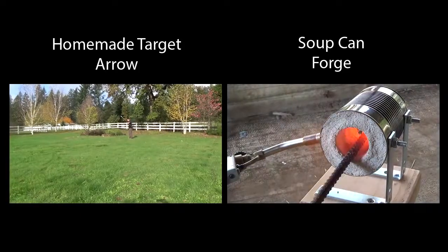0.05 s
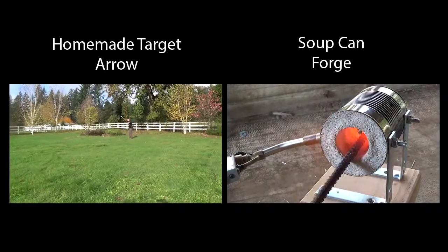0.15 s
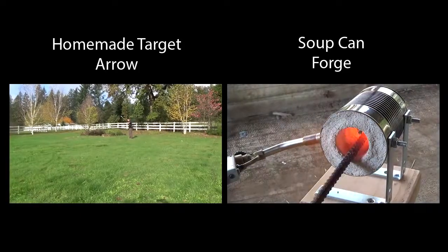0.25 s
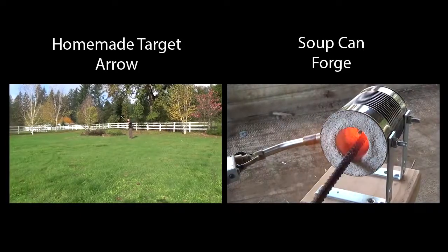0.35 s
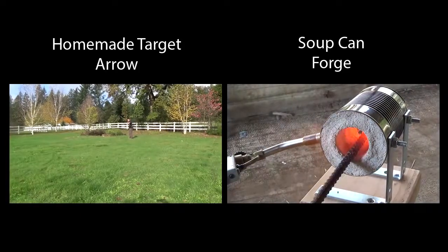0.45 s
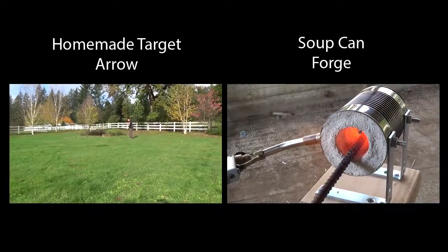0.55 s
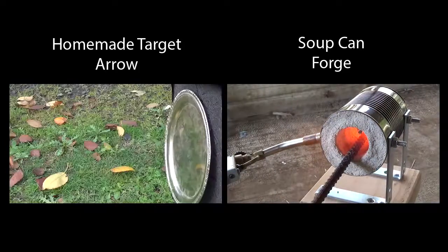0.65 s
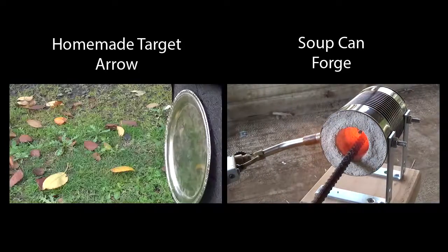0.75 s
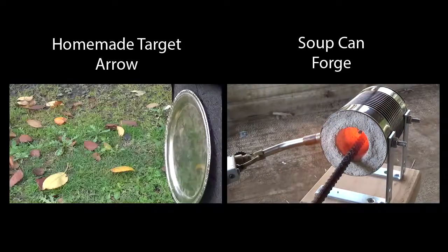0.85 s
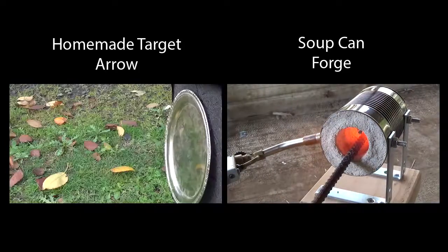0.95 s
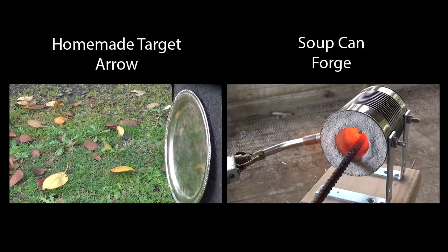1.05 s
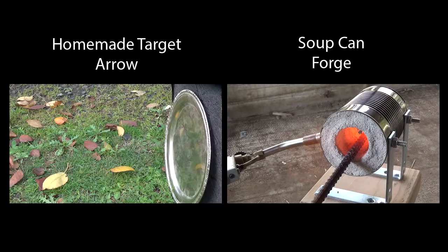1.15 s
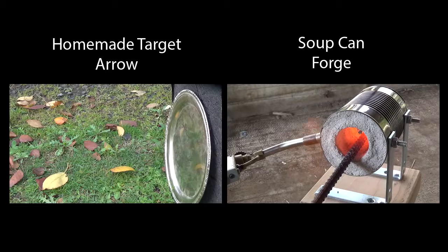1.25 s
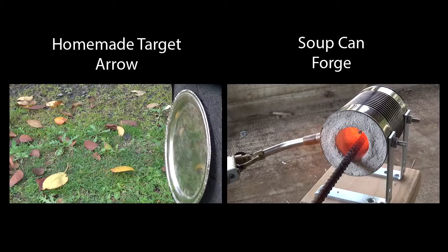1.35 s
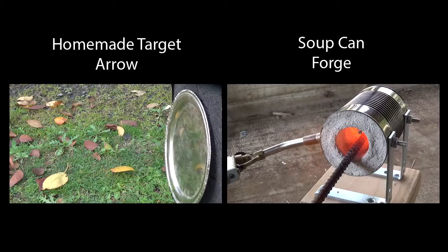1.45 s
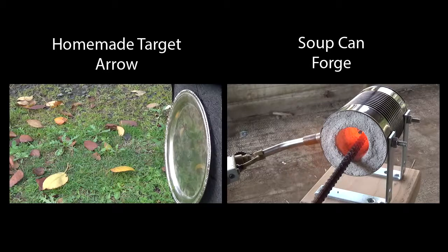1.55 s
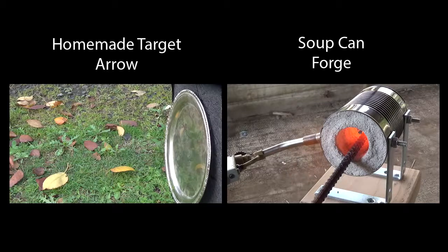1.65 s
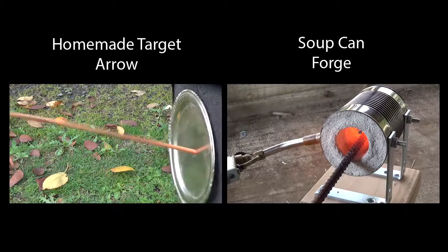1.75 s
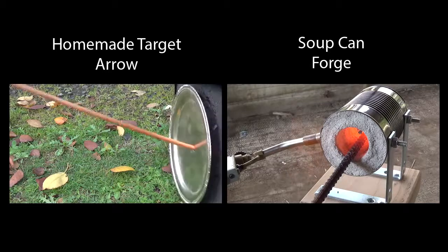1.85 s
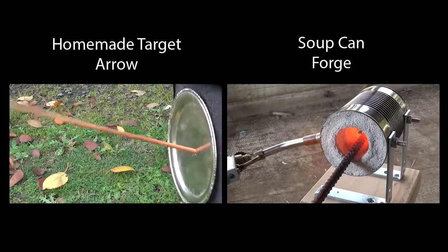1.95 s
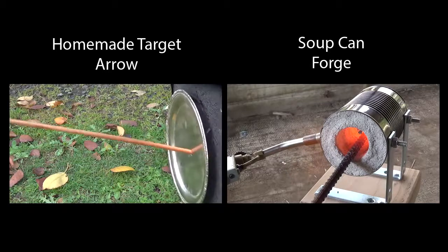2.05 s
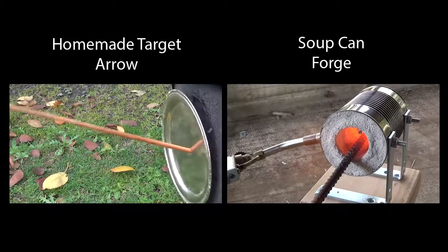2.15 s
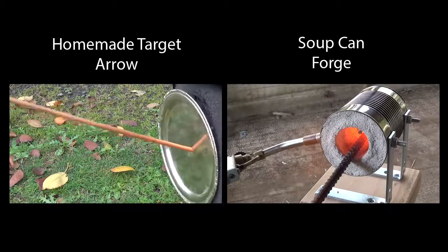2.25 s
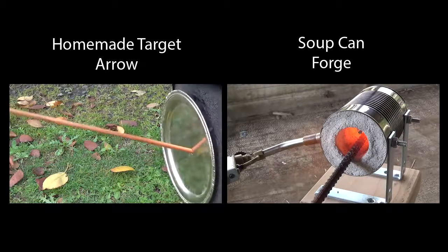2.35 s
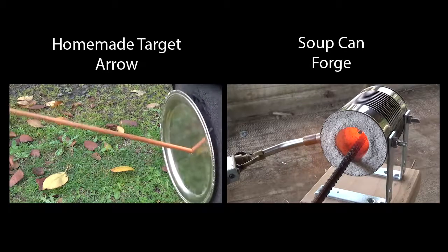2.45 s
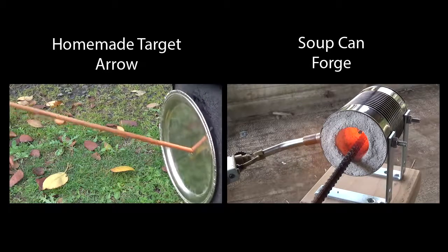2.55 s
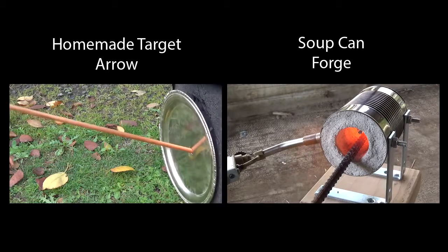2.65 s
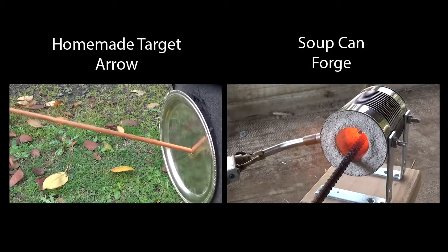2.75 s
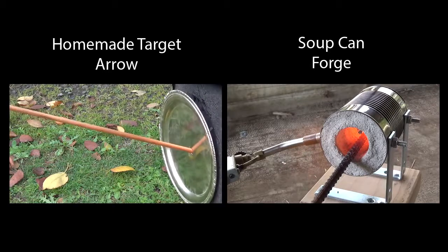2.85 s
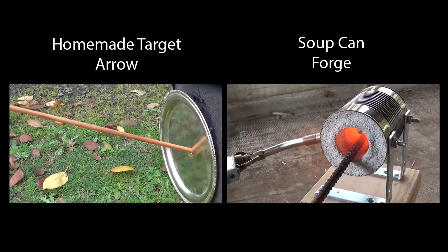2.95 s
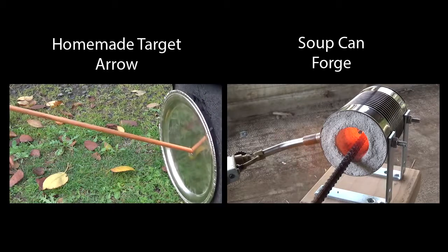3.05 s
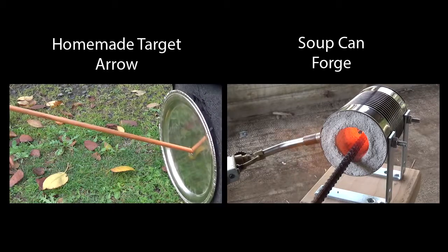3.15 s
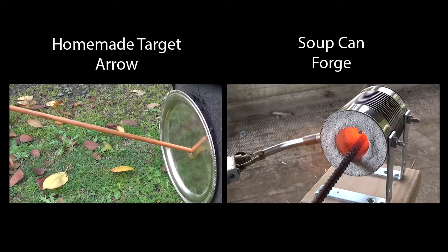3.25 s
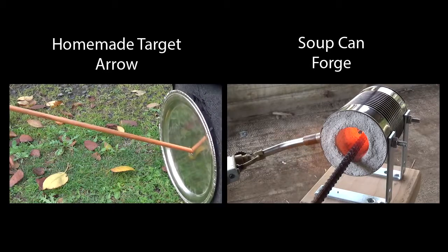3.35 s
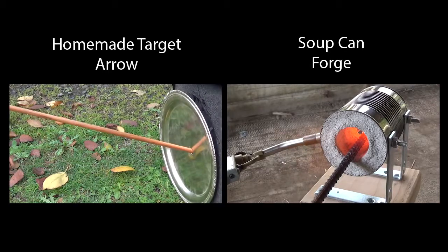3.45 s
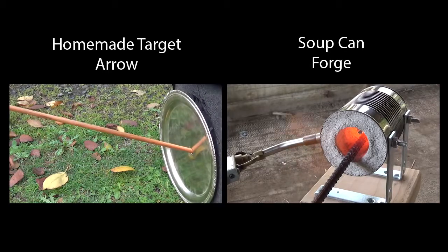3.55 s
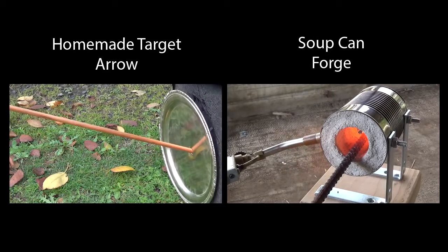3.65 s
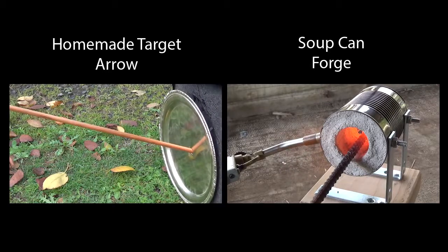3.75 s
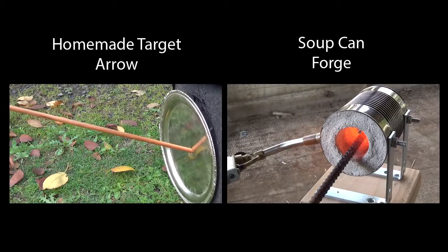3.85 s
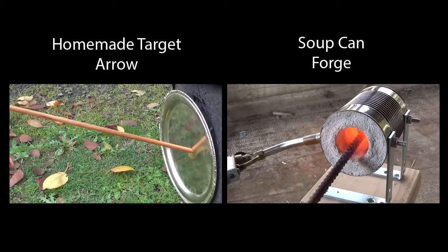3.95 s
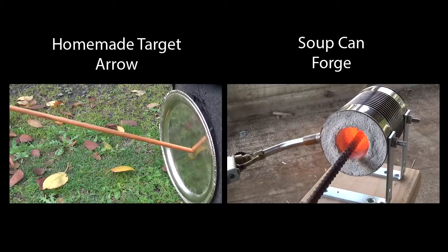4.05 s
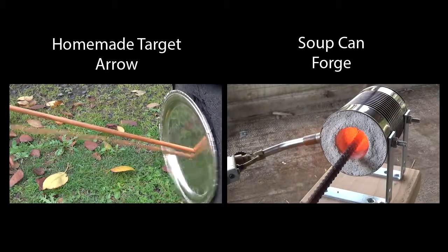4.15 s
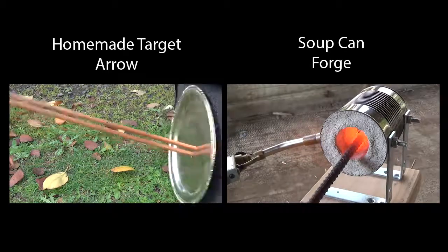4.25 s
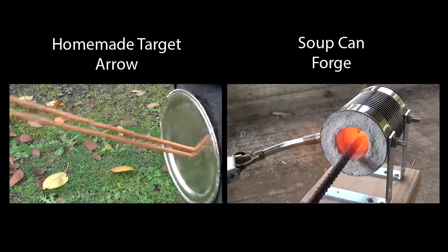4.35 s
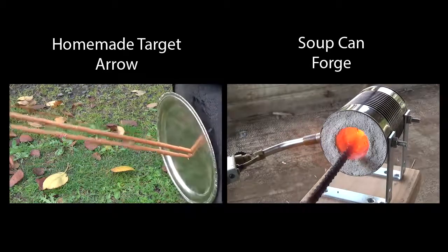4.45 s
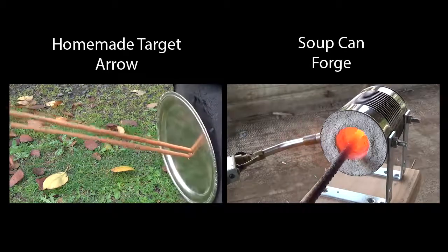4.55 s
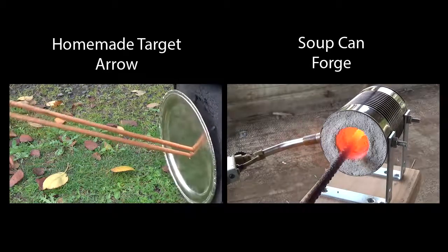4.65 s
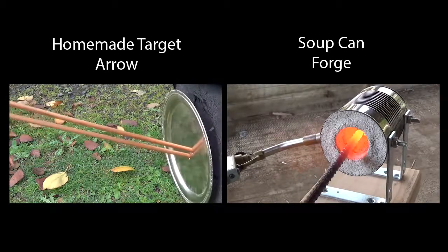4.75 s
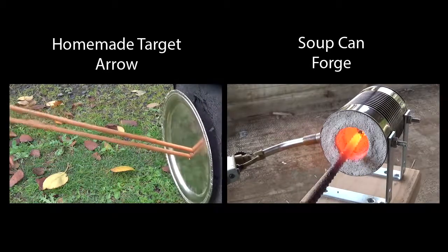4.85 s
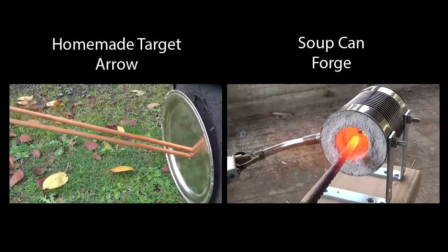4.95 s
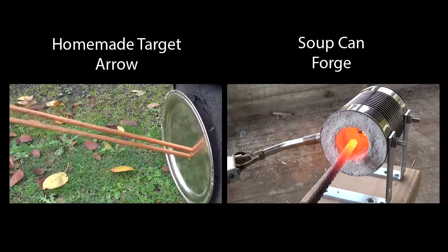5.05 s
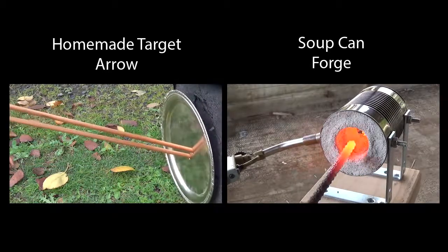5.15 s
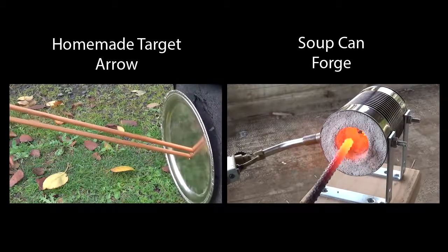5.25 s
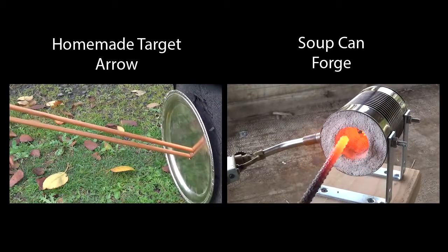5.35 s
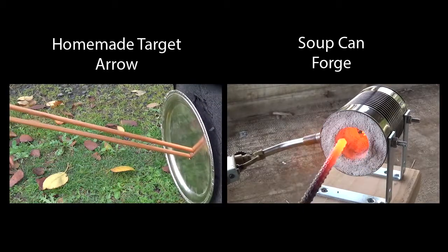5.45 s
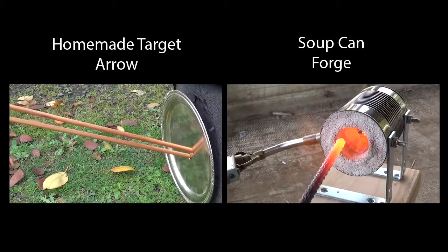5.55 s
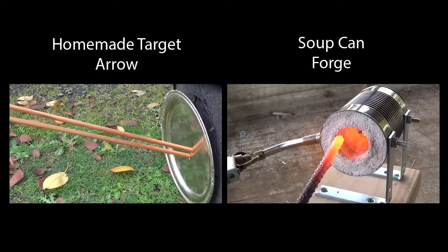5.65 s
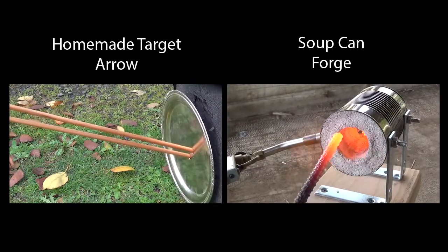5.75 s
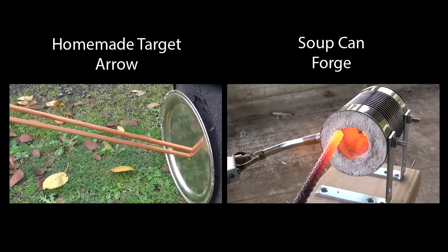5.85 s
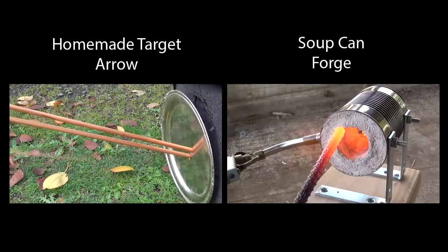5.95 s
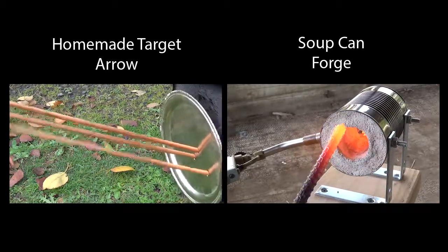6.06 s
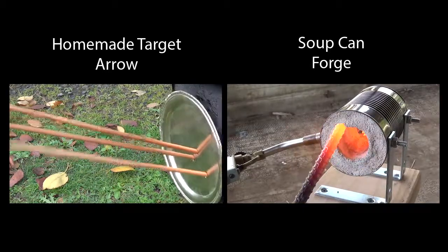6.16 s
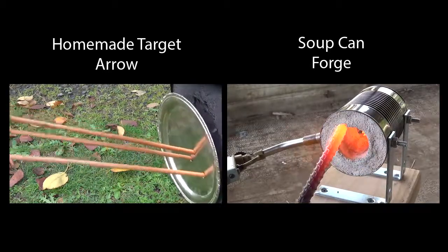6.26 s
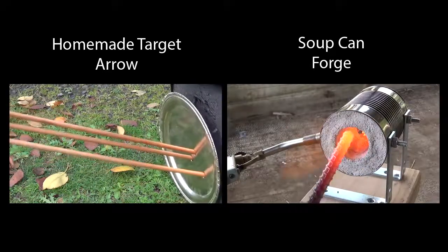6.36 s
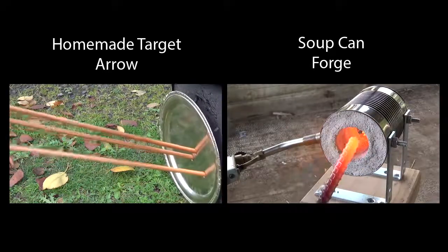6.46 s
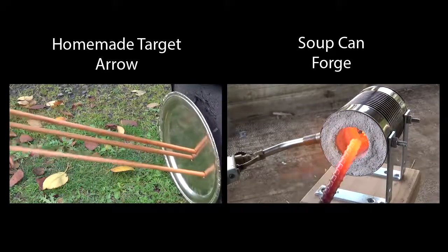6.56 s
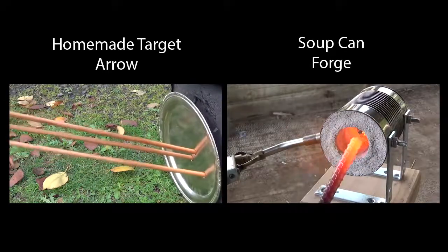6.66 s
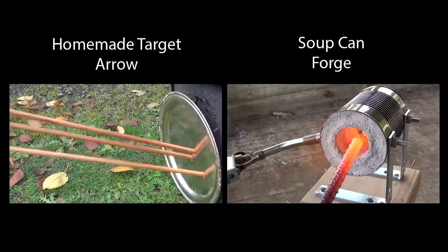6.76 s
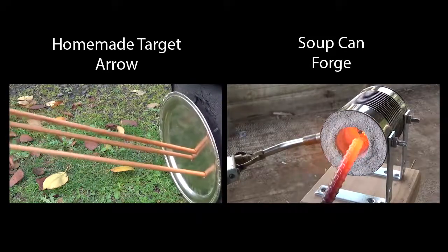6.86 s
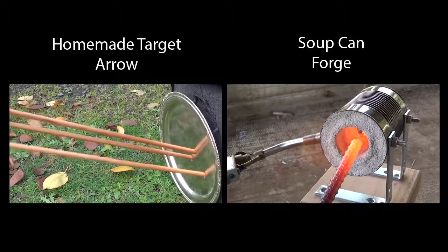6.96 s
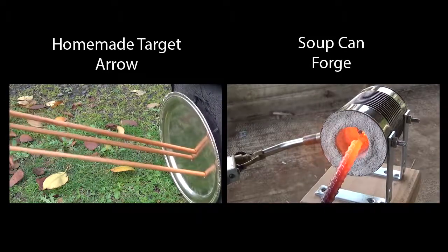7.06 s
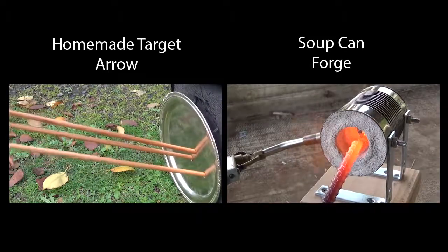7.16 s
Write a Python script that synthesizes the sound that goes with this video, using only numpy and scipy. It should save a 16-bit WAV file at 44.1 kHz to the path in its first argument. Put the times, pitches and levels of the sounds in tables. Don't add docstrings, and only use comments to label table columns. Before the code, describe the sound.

From 0 s a gas torch burns close to the stereo microphone, a steady airy hiss and soft turbulent roar coloured by a small hollow can, with little spits and swells around 0.8, 1.2 and 2.5 s. A faint distant engine drones mostly right from 0.6 to 3.2 s, rising in pitch, then again lower from 3.9 to 5.4 s. At 1.8 s a bright string slap and low bow thump lead straight into an arrow hitting a thin metal tray: a sharp crack and noisy tinny rattle, gone in about half a second. A second, drier shot lands at 4.2 s, with small ticks near 4.6 s. From 3.4 to 6.75 s the flame's hollow resonance shifts as a rod is withdrawn. The third strike at 6.05 s has a fainter slap, brief chatter and ticks until 6.45 s. A sharp flame spit comes at 6.6 s, then the roar weakens slightly, continuing to 7.2 s.

```python
import sys
import numpy as np
from scipy import signal
from scipy.io import wavfile

SR = 44100
rng = np.random.default_rng(int(sys.argv[2]) if len(sys.argv) > 2 else 0)


def digitize_waveform(pressure):
    field = np.atleast_2d(pressure).T
    bounded = np.clip(field, -1, 1)
    quanta = np.round(bounded * 32767).astype(np.int16)
    wavfile.write(sys.argv[1], SR, quanta)


def voltage_ratio(decibels):
    exponent = np.asarray(decibels, float) / 20
    return 10 ** exponent


N = 317069


def at_hz(points, hz):
    table_hz, level_db = np.transpose(points)
    return np.interp(np.log(hz), np.log(table_hz), level_db)


def in_time(rows, times):
    row_s, *columns = np.transpose(rows)
    return [np.interp(times, row_s, column) for column in columns]


def rms_one(x):
    return x / np.sqrt(np.mean(x ** 2) + 1e-20)


def drift(rate_hz):
    r = np.exp(-80 * np.pi * rate_hz / SR)
    noise = rng.standard_normal(N // 40 + 2002)
    slow = signal.lfilter([1], [1, -2 * r, r * r], noise)[2000:]
    return np.interp(np.arange(N) / 40, np.arange(len(slow)), rms_one(slow))


def resonate(x, hz, width_hz):
    r = np.exp(-np.pi * width_hz / SR)
    feedback = [1, -2 * r * np.cos(2 * np.pi * hz / SR), r * r]
    return signal.lfilter((1 - r * r) / 2 * np.array([1, 0, -1]), feedback, x)


def add(out, sound, start_s):
    i = int(start_s * SR)
    out[..., i:i + sound.shape[-1]] += sound[..., :N - i]


# pitch_hz, level_db
FLAME_SIDE = [(60, -2.5), (140, -12), (350, -14.5), (830, -12.5), (2000, -24.5), (4810, -7.5), (11600, -9)]
# pitch_hz, left_minus_right_db
LEAN = [(60, -13.5), (140, -7), (350, -3.5), (830, 0), (2000, -1), (4810, -0.5), (11600, 1.5)]


def spread(mid_side, hz):
    side = voltage_ratio(at_hz(FLAME_SIDE, hz) - 2.5) * mid_side[1]
    pair = mid_side[0] + side * [[1], [-1]]
    return pair * voltage_ratio(at_hz(LEAN, hz) * np.array([[.5], [-.5]]))


# pitch_hz, level_db_per_hz
ROAR = [(18, -50), (30, -24), (129, -3.5), (432, -5), (1000, -3), (1220, -4.5), (1560, 1.5), (2560, -12.5),
        (3040, -13), (3440, -23), (3900, -11), (4200, -26.5), (11000, -21.5), (14300, -58), (22000, -120)]
# pitch_hz, width_hz, rod_in_db, rod_out_db
CAVITY = [(518, 87, -10, -3.5), (713, 110, -3, -26), (866, 66, -15, -2.5), (983, 84, -0.5, -4.5),
          (1500, 130, 4, -24), (1745, 120, -13, -1), (2196, 110, -4, -11.5), (2765, 97, -13, -20),
          (3010, 79, -1.5, -3.5), (3893, 78, -13.5, -16.5), (4720, 210, -21, -19.5), (5114, 122, -21, -13),
          (5316, 28, -14.5, -25), (6000, 440, -24, -20), (6170, 17, -14, -9.5), (7040, 220, -27, -15.5),
          (7580, 300, -30, -29), (8100, 77, -28, -52), (9960, 210, -21, -54)]
# pitch_hz, width_hz, depth (0 to 1)
HOLLOWS = [(444, 32, 0.45), (1225, 45, 0.44), (3440, 210, 0.32), (6650, 440, 0), (9260, 520, 0.34)]
# time_s, level_db
FLAME = [
    (0, -48.5),
    (1.2, -48.5),
    (3.6, -49),
    (4.5, -48),
    (6.5, -48.5),
    (6.9, -51.5),
    (7.19, -51),
]
# centre_s, more_hiss_db, half_length_s
GUSTS = [
    (0.83, 4, 0.11),
    (1.25, 2.5, 0.82),
    (2.46, 3.5, .06),
    (2.992, 1.7, 0.3),
    (4.304, 2.7, 0.48),
    (6.615, 5, .06),
]
HISS_DB, HISS_FOLLOWS = -63, 0.6
ROD_STARTS_S, ROD_OUT_S, ROD_REST = 3.4, 6.75, 0.076


def furnace(roar_db=-3.5, flicker_db=0.76, patchy_db=1.5):
    times = np.arange(N) / SR
    flame_db, = in_time(FLAME, times)
    hiss_db = HISS_DB + HISS_FOLLOWS * (flame_db - flame_db.mean())
    for centre_s, more_db, half_s in GUSTS:
        hiss_db = hiss_db + more_db * np.exp(-((times - centre_s) / half_s) ** 2)
    rod_out = np.interp(times, [ROD_STARTS_S, ROD_OUT_S], [ROD_REST, 1])
    white = rng.standard_normal((2, 2, N))
    surge_db = flicker_db * drift(14.4)

    low, high = np.zeros((2, N)), np.zeros((2, N))
    edges = 28 * 2 ** np.arange(0, 9, .4)
    for k, (bottom_hz, top_hz) in enumerate(zip(edges, edges[1:])):
        hz = np.sqrt(bottom_hz * top_hz)
        band_filter = signal.butter(2, [bottom_hz, top_hz], "band", fs=SR, output="sos")
        band = signal.sosfilt(band_filter, white[k % 2])
        level_db = at_hz(ROAR, hz) + roar_db + patchy_db * drift(7.7)
        add(high if hz > 3400 else low, voltage_ratio(level_db) * spread(band, hz), 0)

    white = rng.standard_normal((2, N))
    for k, (hz, width_hz, in_db, out_db) in enumerate(CAVITY):
        once = resonate(white, hz, 1.75 * width_hz)
        band = resonate(once, hz, 1.75 * width_hz) * (-1) ** k
        level_db = in_db + rod_out * (out_db - in_db) + patchy_db * drift(2.2)
        add(high if hz > 3400 else low, voltage_ratio(level_db) * spread(band, hz), 0)

    flame = rms_one(low) * voltage_ratio(flame_db + surge_db) + rms_one(high) * voltage_ratio(hiss_db + surge_db)
    for hz, width_hz, depth in HOLLOWS:
        flame = flame - depth * resonate(flame, hz, width_hz)
    return flame


# time_s, pitch_hz, level_db
ENGINE = [
    [(.62, 78, -77), (.75, 77.7, -67.5), (1.3, 76.8, -67), (1.75, 85.3, -67), (2.4, 93.1, -76),
     (3, 92.8, -73.5), (3.25, 91.5, -87)],
    [(3.9, 66, -85), (4.1, 63.8, -77), (4.6, 62.7, -70), (5.2, 55.7, -73), (5.45, 57, -122)],
]


def engine():
    out, times = np.zeros(N), np.arange(N) / SR
    for rows in ENGINE:
        hz, level_db = in_time(rows, times)
        on = (times > rows[0][0]) & (times < rows[-1][0])
        strength = np.sqrt(2) * voltage_ratio(level_db + 0.56 * drift(7.7))
        out += on * strength * np.sin(2 * np.pi * np.cumsum(hz) / SR)
    return out * voltage_ratio([[-6], [3.5]])


# start_s, peak_db, pitch_hz, t60_s
THUMPS = [
    (1.807, -33, 185, 0.15),
    (4.218, -32, 191, 0.085),
    (6.028, -34.5, 188, 0.14),
]
# start_s, level_db, centre_hz, width_hz, t60_s
SLAPS = [
    (1.8042, -26.5, 4000, 24000, .028),
    (4.198, -34.5, 1900, 1700, .05),
    (6.0105, -39.5, 2100, 1500, .045),
]
# start_s, level_db, centre_hz,
# width_hz, t60_s
TICKS = [(1.784, -41.5, 1610, 1210, 0.22), (1.81, -48, 6000, 16000, 0.5), (2.213, -60, 5070, 4060, 0.062),
         (4.212, -48, 2000, 5000, 0.19), (4.214, -47, 7000, 12000, 0.073), (4.229, -49, 6000, 8000, 0.3),
         (4.56, -55, 3700, 2500, 0.031), (4.606, -50, 4150, 2970, .04), (6.019, -39.5, 1960, 1500, 0.096),
         (6.026, -43, 5000, 16000, 0.037), (6.032, -54, 6000, 12000, 0.47), (6.189, -46, 8550, 6000, 0.1),
         (6.268, -50.5, 4500, 8000, 0.099), (6.325, -54, 2980, 6000, .1), (6.342, -49.5, 3500, 5000, .04),
         (6.385, -57, 3500, 3980, .04), (6.443, -55, 4000, 6000, 0.05)]


def bow():
    out, t = np.zeros((2, N)), np.arange(SR // 3) / SR
    for start_s, peak_db, hz, t60_s in THUMPS:
        overtone = 0.38 * np.sin(2 * np.pi * 2.06 * hz * t) * voltage_ratio(-200 * t)
        thump = np.sin(2 * np.pi * hz * t) + overtone
        rise = 1 - np.exp(-t / .0015)
        add(out, voltage_ratio(peak_db - 60 * t / t60_s) * rise * thump * voltage_ratio([[-2.5], [2.2]]), start_s)
    for start_s, level_db, hz, width_hz, t60_s in SLAPS + TICKS:
        once = resonate(rng.standard_normal((2, len(t))), hz, width_hz)
        mid, side = resonate(once, hz, width_hz)
        burst = rms_one(mid + .2 * side * [[1], [-1]])
        rise = 1 - np.exp(-t / .001)
        add(out, rise * voltage_ratio(level_db - 60 * t / t60_s) * burst, start_s)
    return out


# blow_db, share_of_chatter_held, loss_held_db_per_s, loss_after_db_per_s
DYING = [
    (-25, 0.18, 37.5, 53),
    (-4.5, 1.28, 48, 101),
    (0.36, 0.88, 30.5, 157),
    (-0.3, 0.29, 111.5, 238),
]
# boom_db, boom_dying_speed (1 is usual)
BACKING = [
    (-3.5, 0.91),
    (4.5, 1.68),
    (0, 0.76),
]
# start_s, kick_db
REBOUNDS = [
    (1.893, 3.5),
    (1.94, 0.5),
    (2.02, 4),
    (4.291, -1),
    (4.35, 6),
    (6.07, 7.5),
    (6.092, 1),
]
PINNING, KNEE_S = 0.057, 0.029
FLASH_DB, FLASH_S = [-0.5, 3.5, 7.5], 0.016
KNOCK_DB, KNOCK_S = [8, 8, 1], 0.0059


def shaking(shot, t):
    start_s, _, _, level_db, hold_s = STRIKES[shot]
    blow_db, share, held, after = np.array(DYING).T[..., None]
    late_s = KNEE_S * np.logaddexp(0, (t - share * hold_s) / KNEE_S)
    lost_db = (1 + PINNING * shot) * (held * t + (after - held) * late_s)
    boom_db, boom_speed = BACKING[shot]
    lost_db[0] *= boom_speed
    groups_db = level_db + blow_db - lost_db
    groups_db[0] += boom_db
    groups_db[1] += KNOCK_DB[shot] * np.exp(-t / KNOCK_S)
    groups_db[3] += FLASH_DB[shot] * np.exp(-t / FLASH_S)
    for rebound_s, kick_db in REBOUNDS:
        since_s = np.clip(start_s + t - rebound_s, 0, 1)
        groups_db = groups_db + kick_db * (1 - np.exp(-since_s / .004)) * np.exp(-since_s / .016)
    return groups_db


# start_s, crack_peak_db, left_minus_right_db, shaking_db, chatter_s
STRIKES = [
    (1.836, -8.5, -3.5, -23, 0.15),
    (4.247, -9, -3, -25.5, 0.14),
    (6.059, -13, -3, -24, 0.036),
]
TRAY_HZ = [823, 909, 990, 1114, 1216, 1948, 1980, 2610, 2869, 2988, 3014, 3106, 3159, 3256, 3375, 3458,
           3596, 3714, 3800, 3967, 4462, 4645, 4710, 5076, 5781, 5980, 6503, 8290, 8882, 10255]
# strike_one_db, strike_two_db, strike_three_db, gain_on_neighbours_db_per_s
TRAY = [(-29, -14.5, -29.5, 40), (-20, -10.5, -17, -3), (-14.5, -13, -14.5, -6), (-10.5, -7, -11.5, -20),
        (-17, -26, -22, -11), (-6, -10.5, -12.5, 6), (-10, -31, -17, 6.5), (-16.5, -13.5, -30, 37),
        (-29, -19, -19, 47), (-10.5, -11, -26, 30), (-24, -11.5, -23, 53), (-22, -14.5, -15.5, 18),
        (-18, -15, -15, 0), (-15, -38, -20, -3), (-40, -34, -21, 21), (-19, -16.5, -22, 24.5),
        (-23, -34, -23, 5), (-13, -13, -14, -18), (-15, -15.5, -8, -62), (-19, -35, -34, -15),
        (-21, -38, -24, -16), (-11, -15, -13.5, -35), (-12.5, -15.5, -17, -28), (-31, -31, -18, 4),
        (-15, -19, -12.5, 15), (-9.5, -16, -20, 32), (-8.5, -18, -20, 23), (-9, -13, -17, 7),
        (-46, -15, -28, -6), (-16, -27, -25, -12)]
# pitch_hz, level_db_per_mode
THICKET = [(100, -9), (150, -5.5), (200, -2), (270, -7), (400, -18.5), (550, -25), (750, -25.5),
           (1050, -16.5), (1400, -25), (2300, -25), (3000, -26.5), (4500, -28), (5200, -26), (8000, -23),
           (11000, -19)]
# pitch_hz, level_db
TRAY_SIDE = [(100, -5), (400, -8.5), (1000, -17), (2500, -20), (11000, -14.5)]
SHAKE_S = 0.49
GROUP_EDGES_HZ = [90, 300, 500, 2100, 2600, 4300, 7500, 12000]


def tray(clicks_per_s=4500, spiky_db=2.5, sharp_hz=25.4, loose_hz=17.6, steady=0.71, bloom_s=0.013,
         crack_db=-11.5):
    out, lead = np.zeros((2, N)), SR // 10
    t = np.arange(int(SHAKE_S * SR)) / SR
    upper_hz = np.linspace(620, 10950, 210) + rng.uniform(-17.5, 26.7, 210)
    crowd_hz = np.concatenate([np.geomspace(120, 560, 14), upper_hz])
    for shot, (start_s, peak_db, pan_db, *_) in enumerate(STRIKES):
        edges_db = np.repeat(shaking(shot, t), 2, axis=0)
        chance, size, sign = rng.random((3, 2, lead + SR // 2))[:, :, :lead + len(t)]
        clicks = (chance < clicks_per_s / SR) * voltage_ratio(-spiky_db * np.log(size + 0.00086)) * np.sign(sign - .5)

        bloom_db = 20 * np.log10(1.001 - np.exp(-t / bloom_s))
        modes = []
        for hz, row in zip(TRAY_HZ, TRAY):
            modes.append((hz, row[shot] + row[3] * (t - .1) + bloom_db, sharp_hz, steady))
        for hz, chance_db in zip(crowd_hz, 2.86 * rng.standard_normal(len(crowd_hz))):
            modes.append((hz, at_hz(THICKET, hz) + chance_db, loose_hz, 0))

        sound = np.zeros((2, len(t)))
        phases = rng.uniform(0, 2 * np.pi, len(modes))
        for k, (hz, mode_db, width_hz, free) in enumerate(modes):
            place = np.interp(np.log(hz), np.log(GROUP_EDGES_HZ), np.arange(8))
            below = min(int(place), 6)
            group_db = edges_db[below] + (place - below) * (edges_db[below + 1] - edges_db[below])
            rung = resonate(clicks, hz, width_hz * (1 + hz / 6000))[:, lead:]
            rung = rung / np.std(rung[0]) * voltage_ratio([[0], [at_hz(TRAY_SIDE, hz)]]) / (1 + free)
            if free:
                rung[0] += free * np.sin(2 * np.pi * hz * t + phases[k])
            sound += (-1) ** k * voltage_ratio(mode_db + group_db) * rung
        fade = np.clip((t[-1] - t) / 0.064, 0, 1)
        mid, side = sound * voltage_ratio(4.5) * fade

        crack = rms_one(resonate(rng.standard_normal(SR)[:len(t)], 2800, 13500))
        mid = mid + voltage_ratio(peak_db + crack_db - 60 * t / 0.053) * crack
        pan = voltage_ratio((pan_db + 0.9) * np.array([[.5], [-.5]]))
        add(out, (mid + side * [[1], [-1]]) * pan, start_s)
    return signal.sosfilt(signal.butter(3, 100, "high", fs=SR, output="sos"), out)


def scene():
    return furnace() + engine() + bow() + tray()


def band_limit(x):
    return signal.sosfilt(signal.butter(12, 12150, fs=SR, output="sos"), x)


def record(dry):
    rounded = .34 * np.tanh(dry / .34)
    steep = signal.ellip(12, .2, 41, 10980, fs=SR, output="sos")
    cut = signal.sosfilt(steep, rounded)
    return band_limit(cut)


dry = scene()
out = record(dry)
digitize_waveform(out)
```